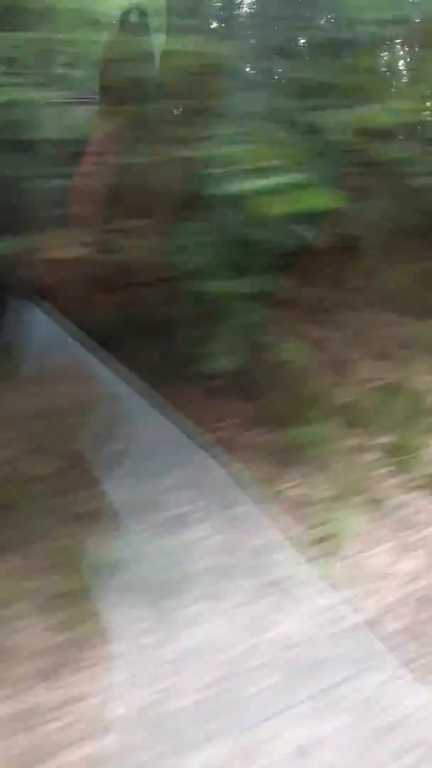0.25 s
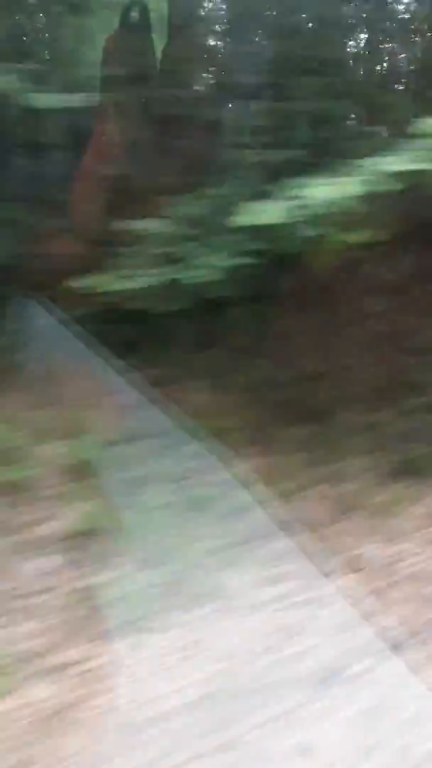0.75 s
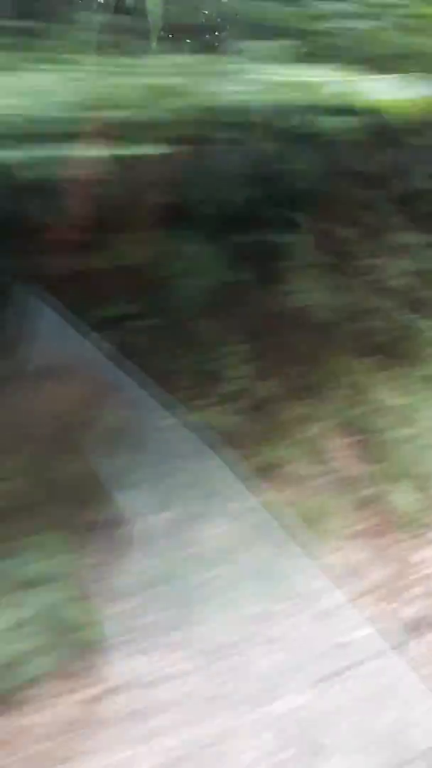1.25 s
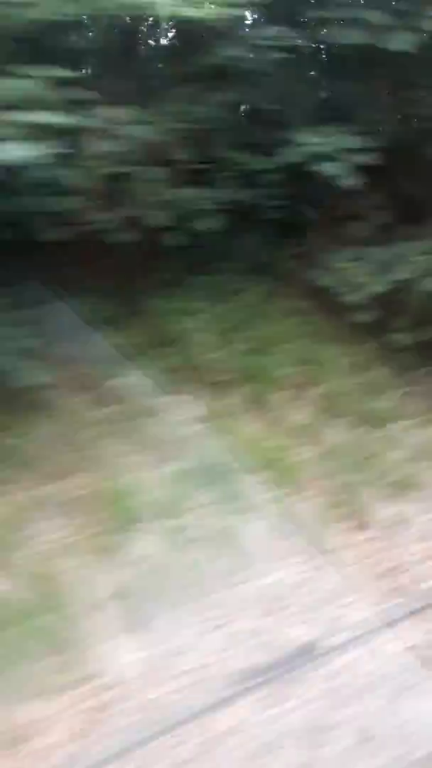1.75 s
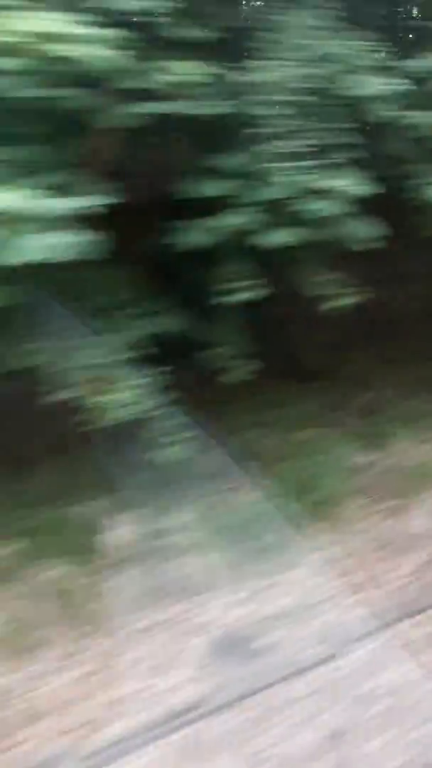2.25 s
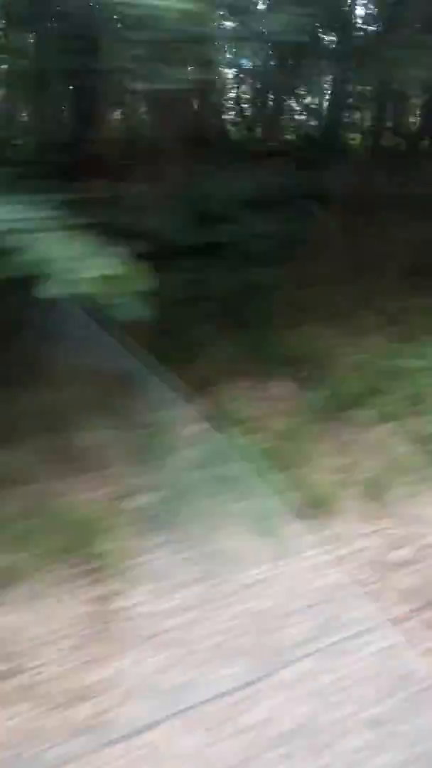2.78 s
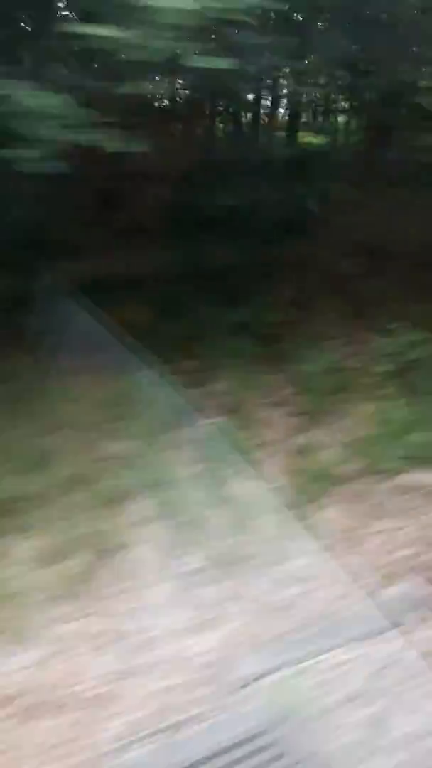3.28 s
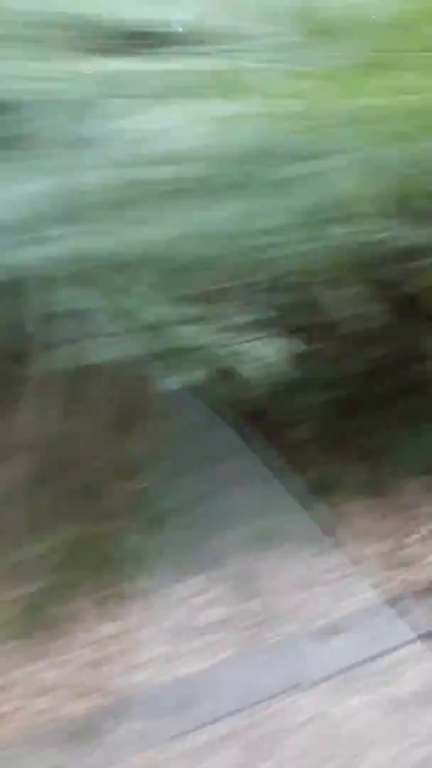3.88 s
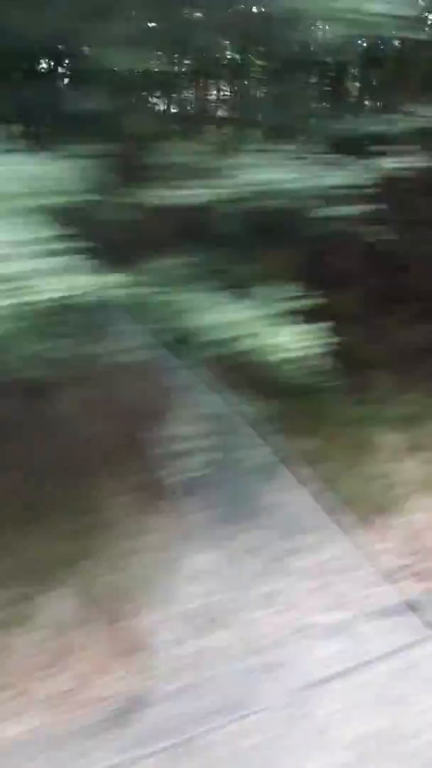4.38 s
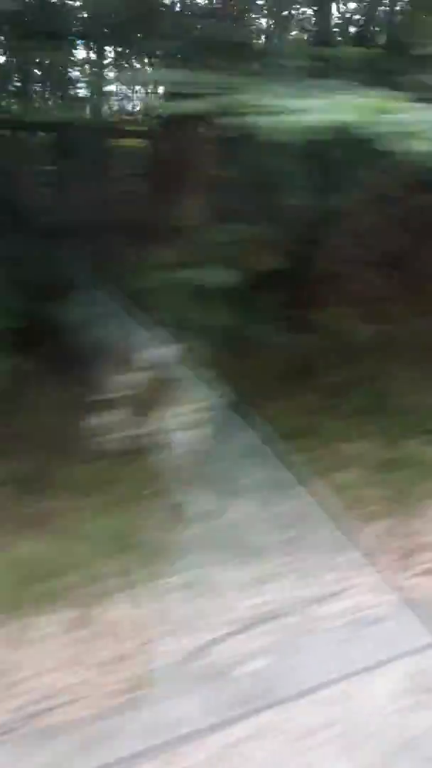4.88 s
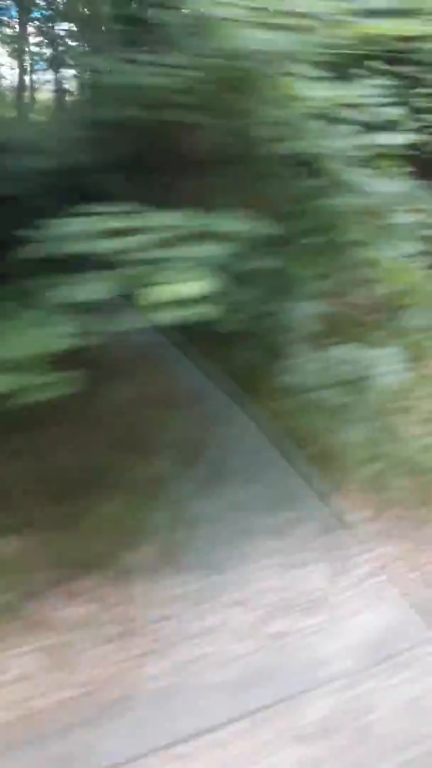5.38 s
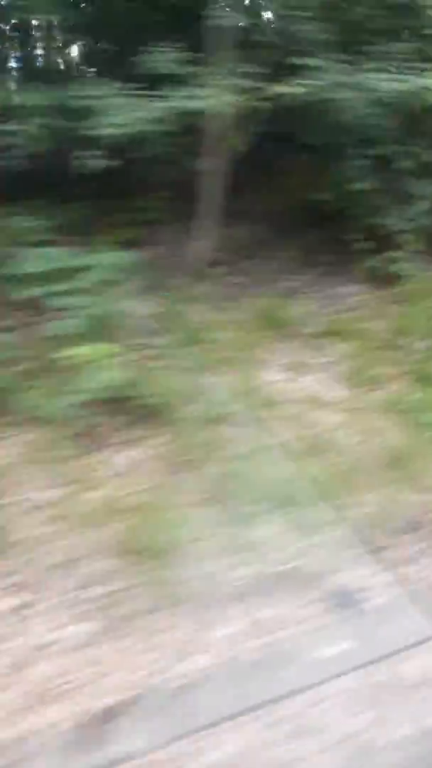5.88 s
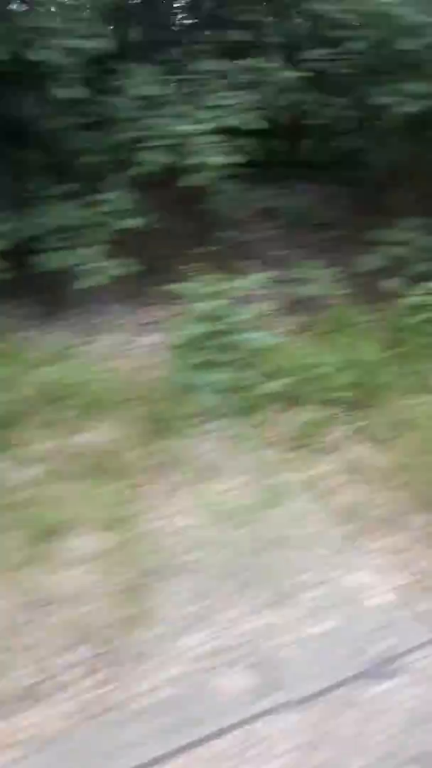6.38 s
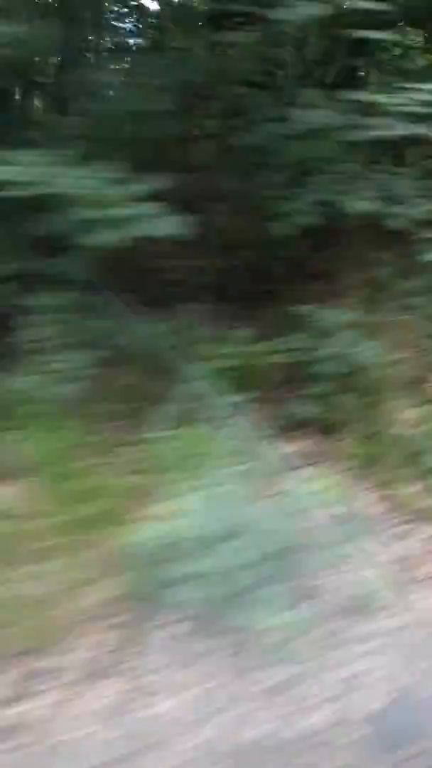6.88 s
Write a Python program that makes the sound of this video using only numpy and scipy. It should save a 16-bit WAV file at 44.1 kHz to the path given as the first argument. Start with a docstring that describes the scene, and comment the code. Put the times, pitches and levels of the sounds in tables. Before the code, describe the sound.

A train's low rolling rumble, heard from the carriage, grows louder midway and fades a little before a brief hollow clack.

```python
"""Inside a railcar in the woods

Rail roughness excites the wheels, which rumble through the floor, while the rails' roar swells and
fades. The running gear jolts, steel rings, and brief low booms sound in the cabin.
The engine's periodic firing makes a drone and a faint buzz until power is cut. Near the end
something hard knocks three times, very quickly and close by, on a damped hollow body."""
import sys
import numpy as np
from scipy import signal
from scipy.fft import rfft, irfft, next_fast_len
from scipy.io import wavfile
from scipy.ndimage import uniform_filter1d

SR = 44100
rng = np.random.default_rng(int(sys.argv[2]) if len(sys.argv) > 2 else 0)


def inscribe(sig):
    """Save sig as 16-bit PCM at rate SR to the path in sys.argv[1].

    A 1-D sig is mono; a 2-D sig holds one channel per row.
    Samples are clipped to [-1, 1] before scaling.
    """
    pcm = np.round(np.clip(np.atleast_2d(sig).T, -1, 1) * 32767)
    wavfile.write(sys.argv[1], SR, pcm.astype(np.int16))


N = 314653
TIME = np.arange(N) / SR

# spectra of body shake, floor rumble, rail roar and its upper rush: (frequency [Hz], density [dB])
SHAKE_SPECTRUM = [(15, -30.5), (33, -15), (46, -11), (65, -3), (85, 0), (105, -0.5), (135, -19.5)]
RUMBLE_SPECTRUM = [(85, -21), (112, -0.5), (135, 0), (160, 3), (185, -3), (210, 0), (228, -4), (252, 1.5),
                   (280, -4), (335, -10), (400, -18), (470, -25.5), (620, -41.5)]
ROAR_SPECTRUM = [(300, -9), (400, 7), (470, 2.5), (545, -2.5), (580, 2), (630, -1.5), (810, -5.5),
                 (960, -9), (1150, -16), (1500, -34)]
RUSH_SPECTRUM = [(900, -19.5), (1180, 2), (1380, 2), (1700, -1.5), (2000, -4.5), (2230, -11), (2480, -22.5),
                 (2800, -24), (3300, -33), (4900, -35.5), (6500, -47.5), (9000, -59)]
# stronger shaking on uneven track: (crest time [s], half length [s], added level [dB])
SWAYS = [(0.147, 0.17, 7.5), (2.008, .09, 6.5), (2.805, .15, 4.5), (3.85, 0.32, 6.5), (4.546, .18, 7),
         (5.504, .35, 9), (7.053, 0.18, 6.5)]
RUMBLE_DB, RUMBLE_SLOPE = -29, 0.45
def wheels():
    """Roughness excitation: the rail shakes the body, drums the floor and radiates a roar."""
    patches = walk(rate=35)  # rough patches lift rumble, roar and rush together
    sway_db = sum(db * swell(s, half_s) for s, half_s, db in SWAYS)
    shake_db = -39.5 + sway_db + 0.7 * walk(rate=5)
    shake = steadied(noise(SHAKE_SPECTRUM), window_s=0.11, share=0.22) * undb(shake_db)
    rumble_db = rolling_db(RUMBLE_DB, RUMBLE_SLOPE) + pull() + .5 * patches  # pull adds up to 1 dB
    rumble = steadied(noise(RUMBLE_SPECTRUM), window_s=0.19, share=0.14) * undb(rumble_db)
    roar_db = rolling_db(usual_db=-47.5, slope=0.7) + 0.54 * patches
    roar = noise(ROAR_SPECTRUM) * undb(roar_db + .7 * walk(rate=14))
    rush_db = rolling_db(usual_db=-64.5, slope=1.004) + patches
    rush = noise(RUSH_SPECTRUM) * undb(rush_db + 0.66 * walk(rate=22))
    return shake + rumble + roar + rush


# rail roughness along the ride, with one long rise and fall: (time [s], level [dB])
ROUGHNESS = [(0, -72), (1.05, -70.5), (1.55, -62.5), (1.85, -62), (3.2, -54.5), (3.5, -52.5), (4.05, -50.5),
             (4.3, -47.5), (4.8, -49.5), (5.4, -58.5), (6.05, -65.5), (6.35, -61), (6.8, -67), (7.05, -56)]
USUAL_ROUGHNESS_DB = -60
def rolling_db(usual_db, slope):
    """Power law: rolling noise gains `slope` dB for each dB of roughness above the usual."""
    times, levels_db = np.transpose(ROUGHNESS)
    return usual_db + slope * (np.interp(TIME, times, levels_db) - USUAL_ROUGHNESS_DB)


# brief low booms near 153 Hz, with one higher blip early and one lower blip late:
# (crest time [s], frequency [Hz], peak level [dB])
BOOMS = [(.65, 266, -28.5), (1.757, 149.6, -17.5), (1.889, 160, -22.5), (2.147, 153.1, -11.5),
         (3.022, 155.8, -17.5), (3.185, 152.4, -23.5), (3.377, 149, -21.5), (3.472, 156, -16),
         (3.898, 155.1, -12.5), (7.03, 116, -24.5)]
def booms():
    """Amplitude modulation: each low tone swells and dies quickly, wavering in pitch."""
    warped_time = TIME + .025 * np.cumsum(walk(rate=40)) / SR
    return sum(undb(db) * swell(s, half_s=.019) * np.sin(2 * np.pi * hz * warped_time)
               for s, hz, db in BOOMS)


# strong jolts of the running gear: (time [s], level [dB])
JOLTS = [(.68, -32), (1.06, -28.5), (1.468, -28.5), (1.87, -26.5), (2.1, -24.5), (3.418, -26.5),
         (3.873, -21.5), (4.899, -24.5), (5.017, -22.5), (5.071, -21.5), (5.198, -24), (6.45, -29),
         (6.547, -27)]
# spectrum of a jolt: (frequency [Hz], density [dB])
JOLT_SPECTRUM = [(90, -6.5), (250, 11), (400, -3.5), (560, -11.5), (1000, -28.5), (2000, -46),
                 (3000, -63.5)]
SMALL_JOLTS_PER_S = 3
def jolts():
    """Structure-borne sound: strong jolts and small random ones thud through the floor."""
    onsets = rng.random(N) < SMALL_JOLTS_PER_S / SR
    small_db = rolling_db(RUMBLE_DB, RUMBLE_SLOPE) - 7.5 + 2 * rng.standard_normal(N)
    envelope = fading(blows(JOLTS) + onsets * undb(small_db), t60=.15)
    return coloured(rng.standard_normal(N) * envelope, JOLT_SPECTRUM)


# three quick blows and a very faint fourth: (time [s], relative level [dB])
KNOCKS = [(5.7125, 1), (5.7614, 1.5), (5.773, -3.5), (5.994, -41)]
# frequency response of the hollow, heavily damped body: (frequency [Hz], gain [dB])
BODY_RESPONSE = [(50, 18), (190, 33), (420, 20), (720, 27.5), (840, 33), (960, 23), (1170, 15), (1480, 21),
                 (1900, 1), (2120, -19), (2330, 4), (2720, -5.5), (3300, -1.5), (4600, -11)]
# spectrum of the rattle after a blow: (frequency [Hz], density [dB])
RATTLE_SPECTRUM = [(2200, 7), (3000, 8), (4200, 0), (5500, 1.5), (6200, -9), (9000, -19)]
def knocks():
    """Impact excitation: each blow sounds the body's impulse response and leaves a thin rattle."""
    hits = blows(KNOCKS)
    thump = signal.fftconvolve(hits, response(BODY_RESPONSE))[:N]
    rattle = undb(-66.5) * noise(RATTLE_SPECTRUM) * fading(hits, t60=.24)
    return thump + rattle


PANEL_HZ, WHEEL_RING_HZ, LOW_RING_HZ = 247, 1830, 578
# resonances of wheel, rail and floor pan, including the three above:
# (crest time [s], half length [s], frequency [Hz], glide [Hz/s], bandwidth [Hz], peak level [dB])
RINGS = [(2.6, 0.17, PANEL_HZ, -0.5, 6, -28), (5.1, .55, 120, 0, 22, -30.5),
         (3, 1.1, WHEEL_RING_HZ, 0.5, 45, -69), (1.52, 0.16, 950, 0.5, 68, -59.5),
         (1.5, 0.89, LOW_RING_HZ, -0.5, 18, -58.5), (4.4, 0.45, 805, 125, 110, -49.5),
         (3.9, 0.4, 2040, 130.5, 200, -63), (4.5, 0.062, 2820, 0.5, 490, -70),
         (3.85, 0.42, 4850, -200, 600, -83)]
def rings():
    """Random excitation: rolling contact rings steel resonances as narrow bands of noise."""
    out = np.zeros(N)
    for s, half_s, hz, glide, width, db in RINGS:
        phase = 2 * np.pi * np.cumsum(hz + glide * (TIME - s)) / SR
        band = walk(2 * width) * np.cos(phase) + walk(2 * width) * np.sin(phase)
        out += undb(db) * swell(s, half_s) * band
    return out


# engine drone in the cabin: (harmonic number [-], level under power [dB])
DRONE_HARMONICS = [(1, -53.5), (2, -46), (4, -41.5), (7, -43.5), (8, -46), (9, -45)]
# spectra of the engine's buzz and high fizz: (frequency [Hz], density [dB])
BUZZ_SPECTRUM = [(1650, -13), (1830, 14), (1950, 11), (2300, 0.5), (2600, 3), (3100, 1.5), (3270, -3.5),
                 (3400, 3), (3680, 0.5), (3900, -15), (5350, -17), (5530, -8), (5800, -15.5), (8000, -25.5)]
FIZZ_SPECTRUM = [(9000, -28.5), (12000, -21), (13500, -10.5), (14600, -9.5), (15600, 2), (16000, 4)]
FIRING_HZ, BUZZ_FALL_DB_PER_S, COAST_DRONE_SHARE = 36.55, 40, 0.22
PULL_S, PULL_EASE_S, CUT_S, CUT_FADE_S = 1.55, 1.05, 3.63, 0.087
def engine():
    """Periodic excitation: firings drone and pulse a buzz; coasting leaves only a weaker drone."""
    cycles = TIME * FIRING_HZ
    burst = 0.46 + np.exp(-.5 * ((cycles % 1 - .8) / 0.11) ** 2)  # one pulse per firing
    dying_db = -BUZZ_FALL_DB_PER_S * np.maximum(TIME - CUT_S, 0)
    buzz = unit(noise(BUZZ_SPECTRUM) * (burst + 0.17)) * undb(-80.5 + 19 * pull() + dying_db)
    fizz = unit(noise(FIZZ_SPECTRUM) * burst) * undb(-80.5 + 14.5 * pull() + dying_db)
    load = np.interp(TIME, [CUT_S, CUT_S + CUT_FADE_S], [1, COAST_DRONE_SHARE])
    drone = np.zeros(N)
    for harmonic, db in DRONE_HARMONICS:  # the ride shakes each one in level and phase
        gain = undb(db + 1.2 * walk(rate=7.4))
        drone += gain * np.sin(2 * np.pi * harmonic * cycles + 1.2 * walk(rate=7))
    return buzz + fizz + load * drone


def pull():
    """Exponential approach: engine effort climbs from 0 at idle towards 1, until power is cut."""
    climb = 1 - np.exp(-np.maximum(TIME - PULL_S, 0) / PULL_EASE_S)
    return climb * np.interp(TIME, [CUT_S, CUT_S + CUT_FADE_S], [1, 0])


# spectrum of the background hiss: (frequency [Hz], density [dB])
HISS_SPECTRUM = [(2000, 4.5), (4000, 2), (6500, -3), (10000, -3.5), (13000, -2), (15500, 4.5)]
def hiss():
    """Broadband noise: a faint, even hiss dips once, late in the ride."""
    dip_db = 7.5 * swell(s=6.45, half_s=.42)
    return noise(HISS_SPECTRUM) * undb(-77 - dip_db)


def undb(db):
    """Amplitude ratio of a level in decibels."""
    return 10 ** (np.asarray(db) / 20)


def unit(x):
    """Normalisation to rms 1."""
    return x / np.sqrt(np.mean(x ** 2))


def swell(s, half_s):
    """Gaussian envelope with its crest of 1 at time s."""
    return np.exp(-.5 * ((TIME - s) / half_s) ** 2)


def walk(rate):
    """Random modulation: `rate` steps a second, smoothed to a spread near 1."""
    hold = int(SR / rate)
    steps = np.repeat(rng.standard_normal(N // hold + 1), hold)
    return 1.3 * uniform_filter1d(uniform_filter1d(steps, hold), hold)[:N]


def shape(spectrum, size, skirt_db=80):
    """Magnitude response of (Hz, dB) points on an FFT grid, falling away beyond their ends."""
    log_f = np.log(np.arange(size // 2 + 1) * SR / size + 1)
    hz, db = np.transpose(spectrum)
    beyond = np.abs(log_f - np.clip(log_f, np.log(hz[0]), np.log(hz[-1])))
    return undb(np.interp(log_f, np.log(hz), db) - skirt_db * np.minimum(beyond, 1))


def coloured(x, spectrum):
    """Spectral shaping under which white noise keeps its level."""
    size = 2 * next_fast_len(N // 2 + 4096)
    return irfft(rfft(x, size) * unit(shape(spectrum, size)))[:N]


def noise(spectrum):
    """Gaussian noise of rms 1 with the given spectrum."""
    return unit(coloured(rng.standard_normal(N), spectrum))


def response(spectrum, size=8192):
    """Minimum-phase impulse response, made causal by folding the cepstrum."""
    cepstrum = irfft(np.log(shape(spectrum, size, skirt_db=109.0)))
    cepstrum[1:size // 2] *= 2
    cepstrum[size // 2 + 1:] = 0
    return irfft(np.exp(rfft(cepstrum)))


def steadied(x, window_s, share):
    """Compression: a noise loses a share of its slow chance swells."""
    power = uniform_filter1d(x ** 2, int(window_s * SR)) + 1e-9
    return unit(x / power ** (share / 2))


def blows(rows):
    """Impulse train with one impulse for each (s, dB) row."""
    out = np.zeros(N)
    for s, db in rows:
        out[int(s * SR)] += undb(db)
    return out


def fading(impulses, t60):
    """Exponential decay: the envelope jumps at each impulse and falls 60 dB in t60 seconds."""
    return signal.lfilter([1], [1, -1000 ** (-1 / (t60 * SR))], impulses + 1e-18)


def scene():
    """Superposition: all sources add in one channel."""
    return (wheels() + jolts() + rings() + booms() + engine() + knocks() + hiss())[None]


def record(dry):
    """Band limiting: a steep low-pass cuts the top treble after a 5 ms fade-in."""
    fade_in = np.minimum(TIME / .005, 1)
    low_pass = signal.ellip(10, .2, 80, 15800, fs=SR, output="sos")
    return signal.sosfilt(low_pass, dry * fade_in)


dry = scene()
out = record(dry)
inscribe(out)
```